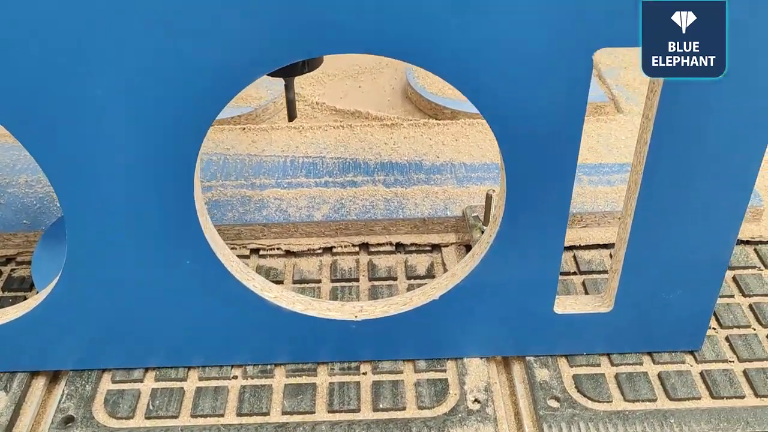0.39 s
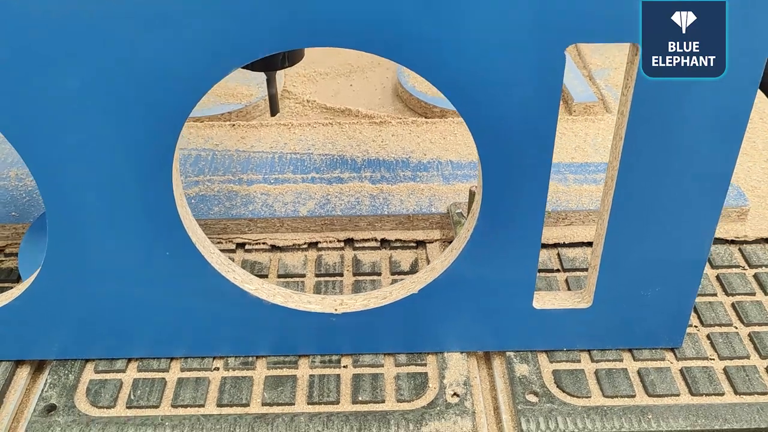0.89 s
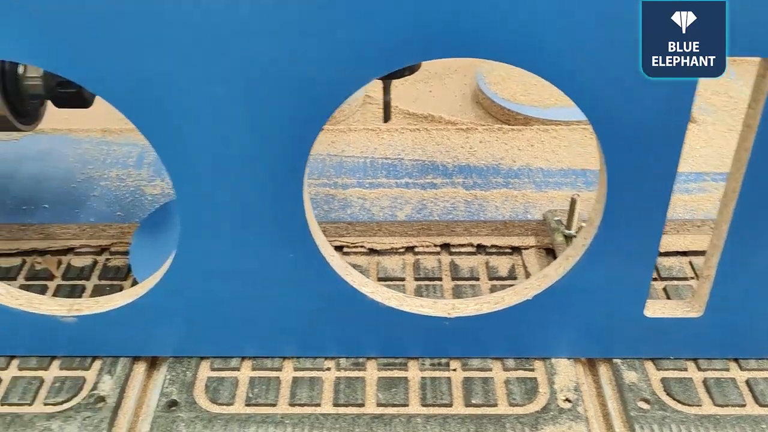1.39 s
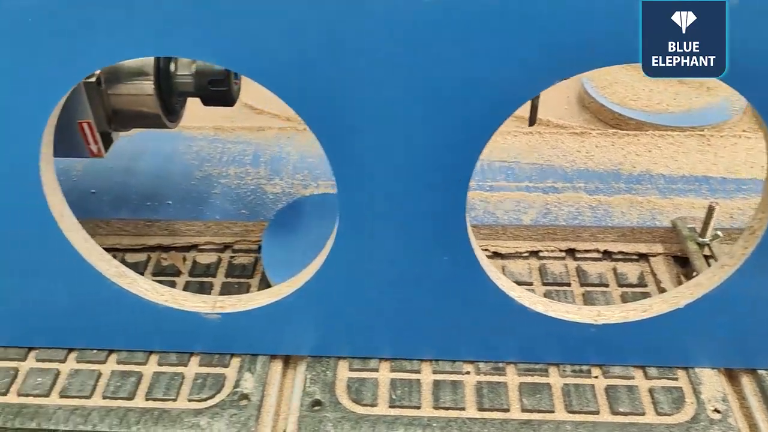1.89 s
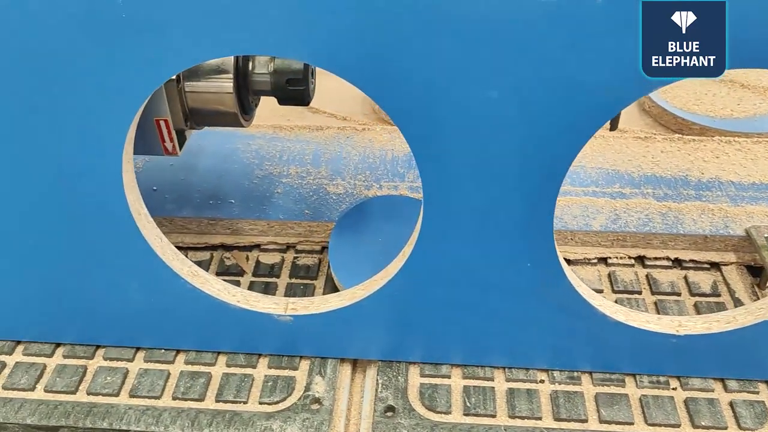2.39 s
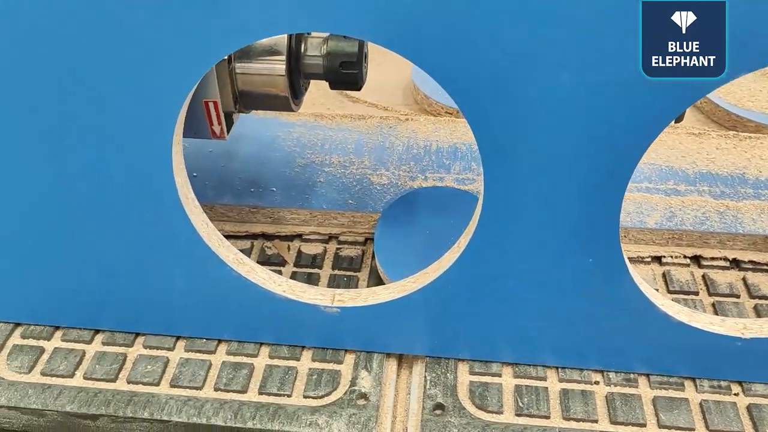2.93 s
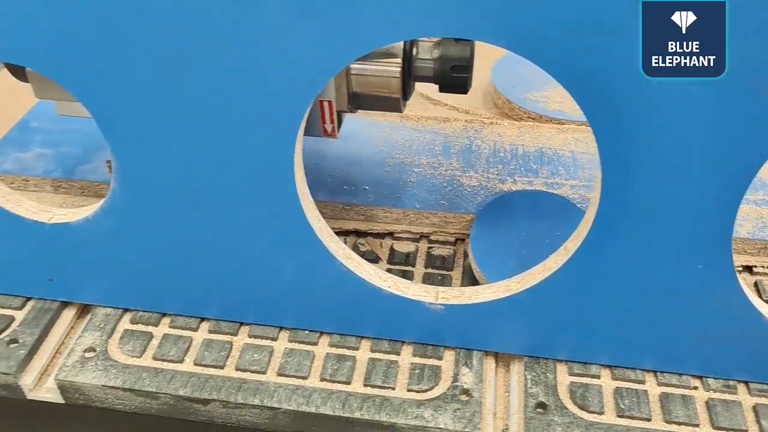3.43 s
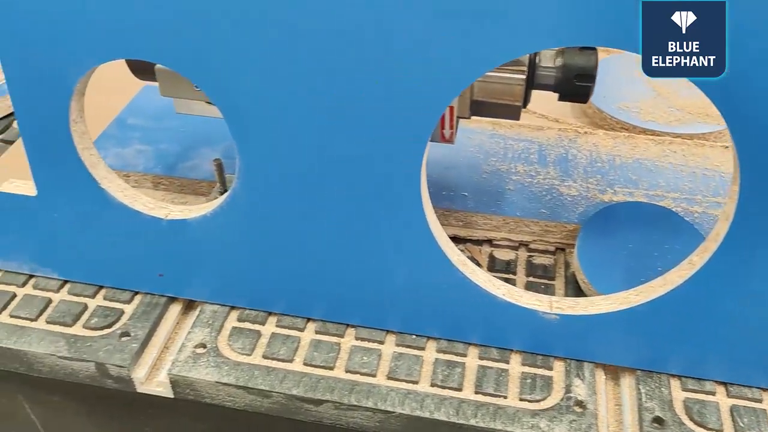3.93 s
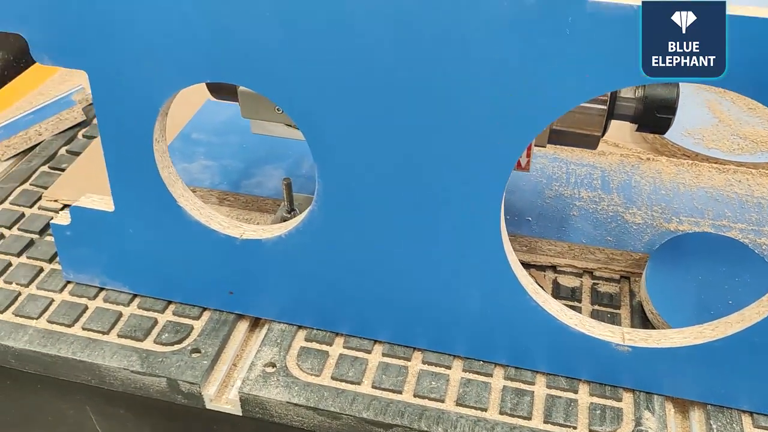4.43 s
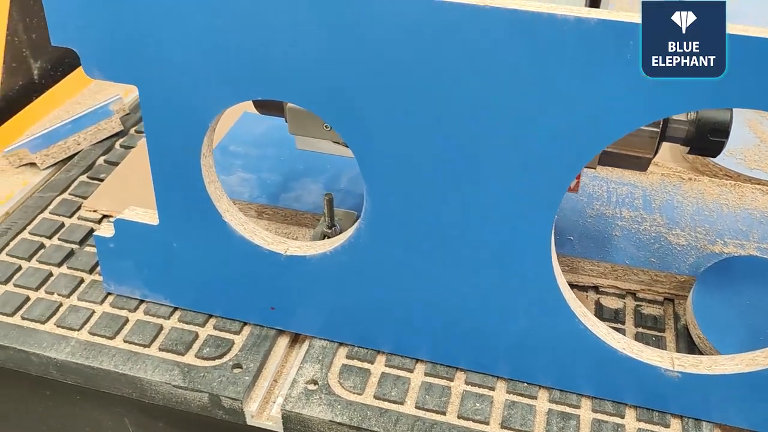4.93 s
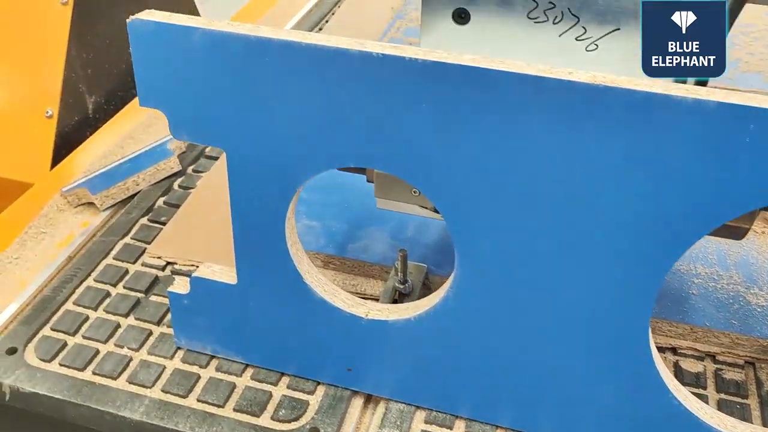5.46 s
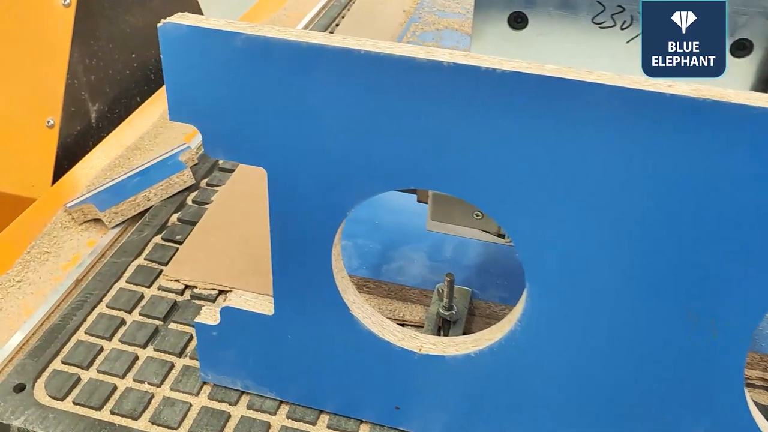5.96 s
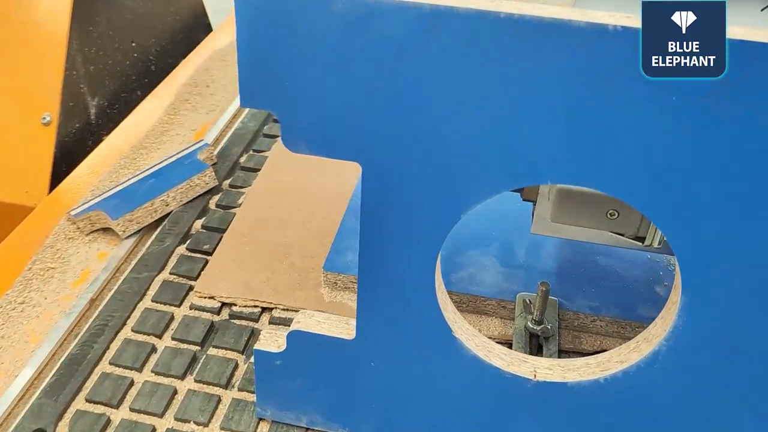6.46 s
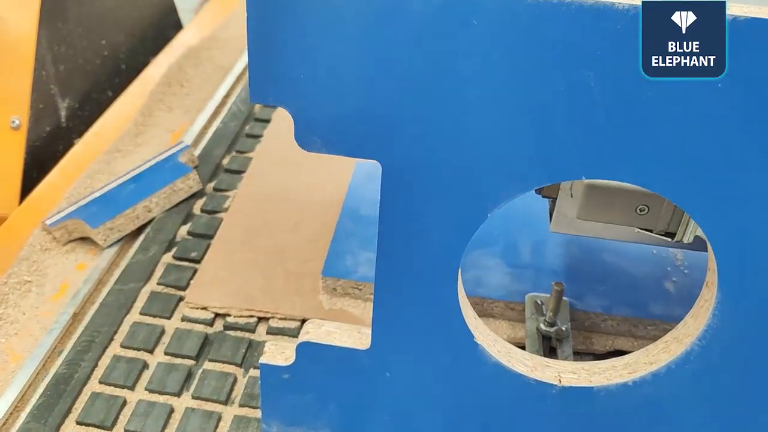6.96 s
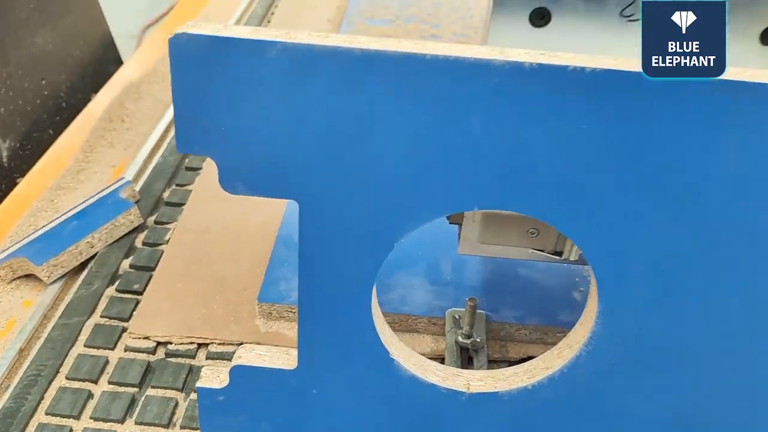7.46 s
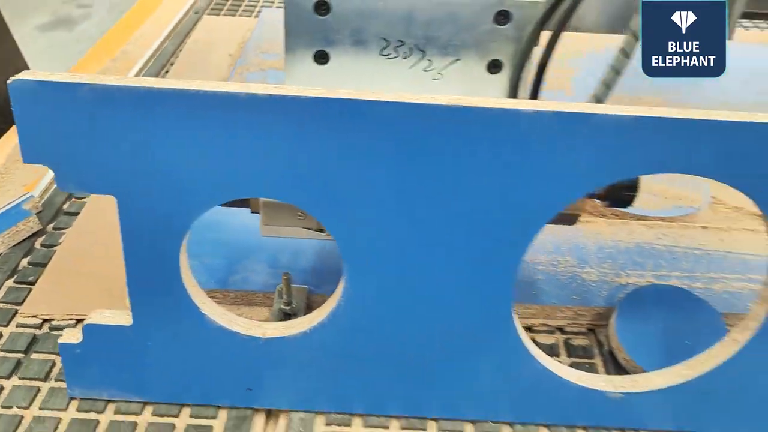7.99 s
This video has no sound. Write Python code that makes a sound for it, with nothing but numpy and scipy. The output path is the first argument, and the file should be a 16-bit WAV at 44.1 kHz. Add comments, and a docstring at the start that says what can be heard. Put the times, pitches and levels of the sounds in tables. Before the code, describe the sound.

Compressed air hisses brightly and steadily to the right, with a breathy, shifting whine inside it and faint workshop rumble far behind.

```python
"""Compressed air leaks from a wood router: a bright hiss made of five noise bands that flutter apart.
The leak also blows across an open tube, whose almost evenly spaced resonances whine as shaped noise.
A hand-held stereo microphone drifts over the table with the leak on its right, so the whine's paths
add and cancel. Far workshop machines rumble as noise, with motor hums and brief drones as sines."""
import sys
import numpy as np
from scipy import signal
from scipy.fft import rfft, irfft, next_fast_len
from scipy.io import wavfile
from scipy.ndimage import uniform_filter1d, minimum_filter1d, map_coordinates

SR = 44100
rng = np.random.default_rng(int(sys.argv[2]) if len(sys.argv) > 2 else 0)


def to_wav(s):
    """Save 16-bit WAV."""
    ch = np.atleast_2d(s).T  # columns
    pcm = np.round(np.clip(ch, -1, 1) * 32767)  # PCM
    wavfile.write(sys.argv[1], SR, pcm.astype(np.int16))


def natural_amplitude(level_db):
    """Convert a level in decibels to a linear amplitude factor, elementwise."""
    exponent = np.asarray(level_db, float) / 20
    return 10 ** exponent


N = 357590
SIZE = next_fast_len(N)   # length of the noise spectra in samples
CONTROL_STEP = 40         # samples between points of the slow controls


def rms_one(x):
    """Scale each channel to rms 1."""
    return x / np.sqrt(np.mean(x ** 2, axis=-1, keepdims=True) + 1e-20)


def in_time(rows):
    """Interpolate a table's columns over its first column, seconds, to one value a sample."""
    seconds, *columns = np.transpose(rows)
    return [np.interp(np.arange(N) / SR, seconds, column) for column in columns]


def from_control(values):
    """Interpolate a slow control to one value a sample."""
    return np.interp(np.arange(N) / CONTROL_STEP, np.arange(len(values)), values)


def drift(corner_hz):
    """Slow chance: noise through two equal one-pole low-passes, scaled to a spread of 1."""
    pole = np.exp(-2 * np.pi * CONTROL_STEP * corner_hz / SR)
    white = rng.standard_normal(N // CONTROL_STEP + 2002)
    slow = signal.lfilter([1], [1, -2 * pole, pole * pole], white)[2000:]   # skip the filter's start
    return from_control(rms_one(slow))


def excitation():
    """Spectra of two unrelated white noises."""
    return rfft(rng.standard_normal((2, SIZE)))


def colour(spectrum):
    """Gain on the frequency grid from (Hz, dB) points, practically silent outside the ends."""
    hz, level_db = np.transpose(spectrum)
    grid_hz = np.arange(1, SIZE // 2 + 2) * SR / SIZE
    return natural_amplitude(np.interp(np.log(grid_hz), np.log(hz), level_db, left=-120, right=-120))


def stereo_noise(white, gain, alike, lead=0, turn=0):
    """Shaped noise, rms 1, partly shared by two ports; lead (rad) turns the left's share, turn both."""
    level = irfft(white * gain, SIZE)[:, :N]
    quarter = irfft(1j * white * gain, SIZE)[:, :N]   # the same noise a quarter turn on
    right, own = np.cos(turn) * level + np.sin(turn) * quarter
    shared = np.cos(turn + lead) * level[0] + np.sin(turn + lead) * quarter[0]
    alike = np.clip(alike, 0, 1)
    left = alike * shared + np.sqrt(1 - alike ** 2) * own
    return rms_one(np.array([left, right]))


def jet():
    """Turbulent air hisses in regions that flutter separately; reflections with wandering delays ripple it."""
    # Levels of the direct jet before flutter. Each row: time in seconds, left and right level of the
    # middle treble in dB, right level of the bright hiss in dB, right level of the top edge in dB.
    jet_levels = [(0.0, -44, -36.5, -25.5, -30), (0.65, -45, -35.5, -25.5, -23.5),
                  (1.3, -45, -37, -26.5, -28), (1.95, -41.5, -40, -27, -29), (2.92, -42, -38, -27, -29),
                  (3.3, -41.5, -37.5, -27.5, -33), (3.57, -42, -38.5, -29, -28),
                  (4.22, -46, -36.5, -27, -28), (4.87, -46, -34.5, -26, -28), (5.6, -45, -36.5, -28.5, -30),
                  (6.16, -42.5, -36.5, -27.5, -30), (6.6, -42, -37, -27, -29.5),
                  (7.4, -43, -39, -27.5, -30), (7.79, -43, -37.5, -27, -27), (8.11, -45, -36, -26.5, -27)]
    # Regions from dull to bright. Each row of a region: frequency in Hz, relative density in dB per Hz.
    jet_colour = [
        [(420, -18), (600, -7), (900, -0.5), (1100, -1.5), (1300, 2.5), (1500, -1), (1600, -27)],
        [(1550, -44), (1750, 2), (2100, -4.5), (2600, -3), (3000, -7), (3500, -5), (4300, -28), (5000, -8),
         (5400, -23)],
        [(4700, -20), (5050, -5.5), (5300, -9.5), (5900, -5), (6500, -3.5), (7050, -1.5), (7500, -4),
         (7850, -7), (8000, -17), (8200, -22), (8400, -35), (9000, -27.5)],
        [(8900, -35.5), (9250, -21), (9800, -11), (10500, -6), (11600, -1), (12300, -1), (13200, -4.5),
         (14900, 1), (15000, -12)],
        [(14850, -15), (15000, -7), (15300, -4), (15500, -3), (15800, -10)],
    ]
    # Spread of each region's level flutter, one column [dB].
    jet_flutter_db = [0.44, 0.5, 0.84, 0.66, 1.2]
    # Steady level of the two dull regions before flutter. Each row: left in dB, right in dB.
    jet_dull = [(-54.5, -52), (-52, -41.5)]
    # Bounces off table and panel. Each row: mean delay in ms, gain in dB, spread of the delay in ms.
    bounces = [(3.7, -11, .03), (1.3, -13, .035), (6.1, -12, .035)]
    bright_left_db, top_left_db = -37.5, -43

    middle_left_db, middle_right_db, bright_db, top_db = in_time(jet_levels)
    levels = [
        *np.reshape(jet_dull, (2, 2, 1)),
        [middle_left_db, middle_right_db],
        [np.full(N, bright_left_db), bright_db],
        [np.full(N, top_left_db), top_db],
    ]
    direct = 0
    for spectrum, level_db, flutter_db in zip(jet_colour, levels, jet_flutter_db):
        gain = natural_amplitude(np.array(level_db) + flutter_db * drift(15.6))
        direct = direct + gain * stereo_noise(excitation(), colour(spectrum), 0.088)

    # only the hiss between 4 and 11 kHz is reflected
    reflected_band = signal.butter(2, [4000, 11000], "band", fs=SR, output="sos")
    reflected = signal.sosfilt(reflected_band, direct)
    out = direct.copy()
    for delay_ms, level_db, wander_ms in bounces:
        for port in range(2):
            late = np.arange(N) - (delay_ms + wander_ms * drift(0.3)) * SR / 1000
            out[port] += natural_amplitude(level_db) * map_coordinates(reflected[port], [late], order=3, mode="mirror")
    return out


def tube(flutter_db=1.0, round_hz=4.1):
    """One turbulence drives all resonances; neighbours partly out of step dip where their flanks cross."""
    # Resonances near multiples of the lowest. Each row: frequency in Hz, fall below and above the top
    # in dB per 100 Hz, left and right level in dB before path gain and flutter.
    resonances = [(776, 9.5, 17.5, -61.9, -62.5), (1555, 12, 8.5, -53.5, -52), (2354.3, 5, 4.5, -52.8, -46),
                  (3146.4, 5, 5.5, -52, -47), (3963.5, 2.5, 3.5, -51.5, -40), (4848, 1, 7, -54.5, -52),
                  (5543, 2.5, 3.5, -66.5, -58.5)]
    # Turn of each resonance away from opposition to the one below, which fills the dip between them:
    # one column [rad].
    out_of_opposition = [0, 1, 1, 1.6, 1.4, .9, 1]

    turns = np.cumsum(out_of_opposition)
    grid_hz = np.arange(SIZE // 2 + 1) * SR / SIZE
    mouth = excitation()
    out = 0
    for k, (hz, below_db, above_db, *port_db) in enumerate(resonances):
        away = (np.hypot(grid_hz - hz, round_hz) - round_hz) / 100   # in 100 Hz, rounded at the top
        shape = natural_amplitude(-away * np.where(grid_hz < hz, below_db, above_db))   # lopsided flanks
        turn = np.pi * k + turns[k] + 0.4 * drift(1.5)
        path_db, alike, lead = arrivals(hz)
        level_db = path_db + np.reshape(port_db, (2, 1)) + flutter_db * drift(15.6)
        out = out + natural_amplitude(level_db) * stereo_noise(mouth, shape, alike, lead, turn)
    return out


def arrivals(hz):
    """Paths add in or out of step as the hand moves: gain dB per port, likeness and left phase lead."""
    # Microphone position over the table. Each row: time in seconds, position along and across in cm,
    # level change from nearness to the tube in dB.
    hand = [(0.0, 1, 0.0, -1.5), (0.48, -1.0, 0.4, -1.9), (0.95, 0.5, 0.3, -1.9), (1.43, 2.5, -0.7, -2.5),
            (1.91, 15, -7, -1.9), (2.39, 14.4, -9, 0.1), (2.86, 14.5, -8.5, 0.5), (3.34, 15.5, -10, 0.5),
            (3.82, 15.4, -10.5, 1), (4.29, 15.5, -13.5, 1.1), (4.77, 17.0, -14.5, 1.3),
            (5.25, 18, -15.5, 1.1), (5.72, 20.5, -16, 0.6), (6.2, 21, -17.5, 0.3), (6.68, 18, -18, 1.6),
            (7.16, 18, -17, 1), (7.63, 20.0, -19, 1.4), (8.11, 24.5, -17.5, -0.5)]
    # Ways of the whine, straight and off table, panel and machine. Each row: extra length in cm,
    # bearing in degrees, extra length to the left port in cm, left and right gain in dB.
    ways = [(0.0, 268.5, 2.2, -1, 0.6), (59.16, 245, -0.04, 5.5, 5), (70.97, 242, -5, -9, 3.5),
            (107.5, 52, 11.5, -1.5, -3), (142.34, 242, -2, 0.2, 6), (177.8, 207, -8, -12, 6),
            (244.94, 230, 18.5, -5.0, 6)]
    sound_cm_per_s = 34300
    diffuse_at_1k_db, diffuse_db_per_octave = -2.5, 4.5   # scattered whine, unrelated at the two ports

    along, across, near_db = np.array(in_time(hand))[:, ::CONTROL_STEP]
    extra, bearing, left_extra, *port_db = np.transpose(ways)[:, :, None]
    angle = np.radians(bearing)
    right_cm = extra + np.cos(angle) * along + np.sin(angle) * across
    left, right = [
        np.sum(natural_amplitude(db) * np.exp(-2j * np.pi * hz * cm / sound_cm_per_s), axis=0)
        for db, cm in zip(port_db, [right_cm + left_extra, right_cm])
    ]
    diffuse = natural_amplitude(diffuse_at_1k_db + diffuse_db_per_octave * np.log2(hz / 1000))
    power = np.abs([left, right]) ** 2 + diffuse ** 2
    alike = np.abs(left * right) / np.sqrt(power[0] * power[1])
    lead = np.unwrap(np.angle(left / right))
    gain_db = [from_control(db) for db in 10 * np.log10(power) + near_db]
    return np.array(gain_db), from_control(alike), from_control(lead)


def workshop():
    """Far machines: two rumble layers, wavering motor tones and brief drones, nearly alike at both ports."""
    # Levels before waver and stereo tilt. Each row: time in seconds, rumble in dB,
    # deep rumble in dB, slowly rising with chance ups and downs.
    shop = [(0.0, -55.5, -72), (0.8, -59, -68.5), (2.4, -57.5, -65), (3.25, -56, -69.5), (3.95, -56.5, -63),
            (4.36, -56.5, -68), (4.55, -53.5, -61), (5.22, -54, -67), (5.98, -52.5, -61), (6.75, -57, -63),
            (7.8, -54.5, -60), (8.11, -53.5, -57)]
    # Rumble spectrum. Each row: frequency in Hz, relative density in dB per Hz.
    rumble_colour = [(71, -43), (120, -8), (220, 1), (263, -2.5), (306, 2), (447, -12), (560, -13),
                     (730, -12), (1230, -120)]
    # Deep rumble spectrum. Each row: frequency in Hz, relative density in dB per Hz.
    deep_colour = [(13, -46), (22, -20), (43, -11), (75, -5.5), (102, 2.5), (124, -10), (150, 2),
                   (200, -19), (330, -120)]
    # Motor tones. Each row: frequency in Hz, peak amplitude in dB before waver and stereo tilt.
    hum = [(50, -74.5), (100, -72), (222, -66), (300, -70.5)]
    # Low drones. Each row: start and end in seconds, start and end frequency in Hz,
    # peak amplitude in dB before waver and stereo tilt.
    drones = [(0.05, 0.296, 368, 350, -57.5), (1.85, 2.053, 305, 310, -57), (2.5, 2.85, 170, 160.5, -58),
              (4.397, 4.795, 182, 182, -56), (4.4, 5.0, 57, 57, -65), (4.95, 5.253, 310, 320, -54),
              (5.252, 5.55, 224, 226, -58), (5.706, 5.95, 295, 306, -51), (6.35, 7.0, 84, 86, -61),
              (6.717, 7.047, 124, 120, -52.5), (7.015, 7.303, 165, 164, -55), (7.277, 8.2, 111, 121, -54),
              (7.3, 8.2, 72, 75, -64)]

    rumble_db, deep_db = in_time(shop)
    rumble = natural_amplitude(rumble_db) * stereo_noise(excitation(), colour(rumble_colour), 0.81)
    deep_gain = natural_amplitude(deep_db + 2.5 * drift(2.9))
    deep = deep_gain * stereo_noise(excitation(), colour(deep_colour), 0.97)

    t = np.arange(N) / SR
    tones = 0
    for hz, level_db in hum:
        phase = 2 * np.pi * hz * t + 0.65 * drift(1.3)
        tones = tones + natural_amplitude(level_db + 3.4 * drift(2.8)) * np.sin(phase)
    for start, end, start_hz, end_hz, peak_db in drones:
        done = np.clip((t - start) / (end - start), 0, 1)
        turns = np.cumsum(start_hz + (end_hz - start_hz) * done) / SR
        swell = np.sqrt(np.abs(np.sin(np.pi * done))) * (done < 1)
        tones = tones + natural_amplitude(peak_db + 2.8 * drift(6.2)) * swell * np.sin(2 * np.pi * turns)

    # each layer leans slightly to the right
    return rumble * natural_amplitude([[-1.4], [1.4]]) + deep * natural_amplitude([[-0.8], [0.8]]) + tones * natural_amplitude([[-1.1], [1.1]])


def scene():
    """Hiss, tube whine and workshop together."""
    return jet() + tube() + workshop()


def spectral_holes(x):
    """Bins that are weak for their surroundings are left empty frame by frame, and the top is cut."""
    # Threshold of the holes. Each row: frequency in Hz, level relative to the surrounding spectrum in dB.
    empty_below = [(1200, -30), (2000, -8), (2800, -9.5), (3500, -8), (4500, -7), (5300, -5), (7500, -5),
                   (8600, -7.5), (10000, -6), (12000, -8), (16000, -9)]
    cutoff_hz = 15760

    framing = dict(window="cosine", nperseg=2048, noverlap=1024)
    hz, _, cells = signal.stft(x, SR, **framing)
    power = np.abs(cells) ** 2
    near = uniform_filter1d(uniform_filter1d(power, size=6, axis=1), size=2, axis=2)
    broad = uniform_filter1d(power, size=61, axis=1)
    limit_db = np.interp(hz, *np.transpose(empty_below))[:, None]
    keep = near > natural_amplitude(2 * limit_db) * broad   # doubled dB: a power ratio
    keep = minimum_filter1d(keep.astype(float), size=3, axis=1)   # widen the holes
    keep = keep * (hz < cutoff_hz)[:, None]
    return signal.istft(cells * keep, SR, **framing)[1][:, :N]


def band_limit(x):
    """A steep low-pass at the top of the band."""
    return signal.sosfilt(signal.butter(12, 17100, fs=SR, output="sos"), x)


def record(dry):
    """Leave holes in the scene's spectrum, then finish the mix."""
    mix = spectral_holes(dry)
    return band_limit(mix)


dry = scene()
out = record(dry)
to_wav(out)
```